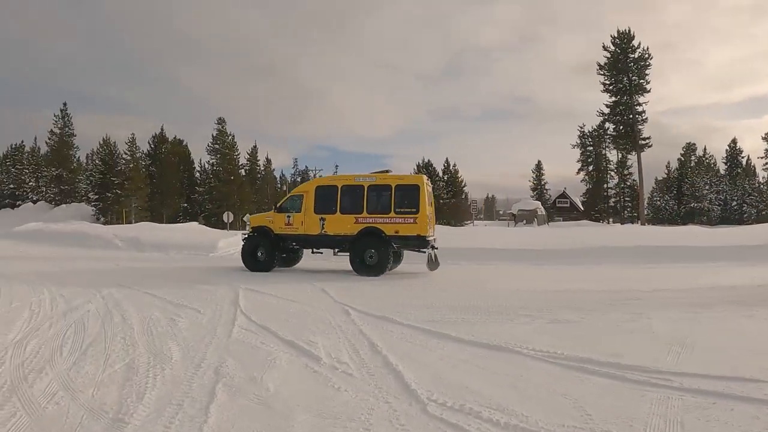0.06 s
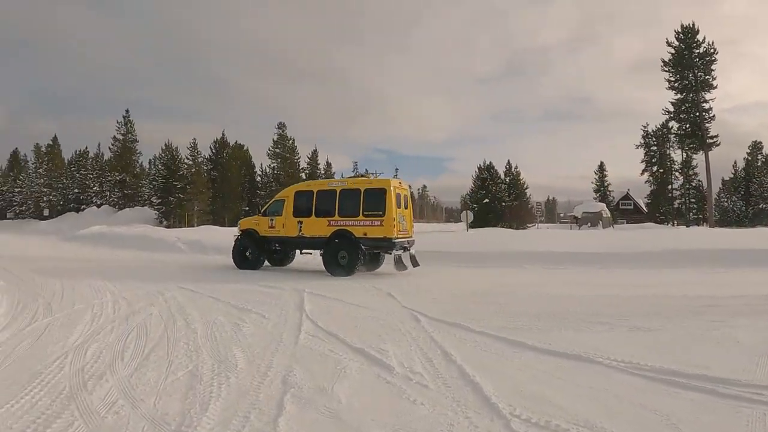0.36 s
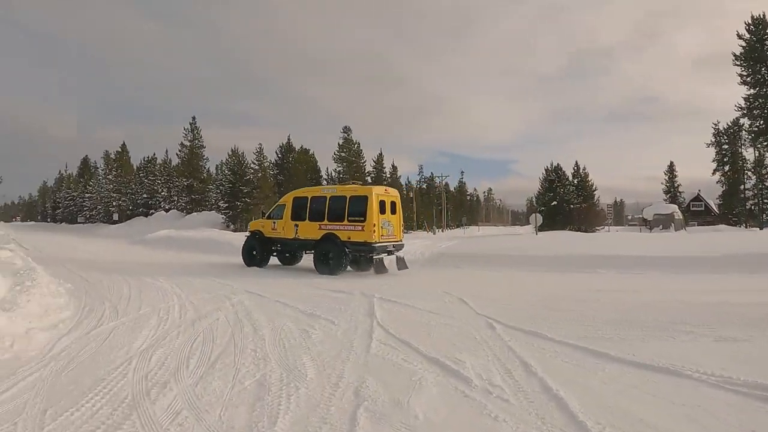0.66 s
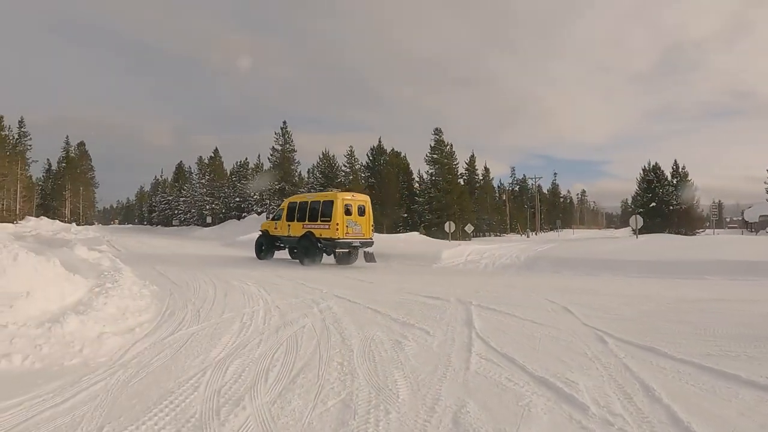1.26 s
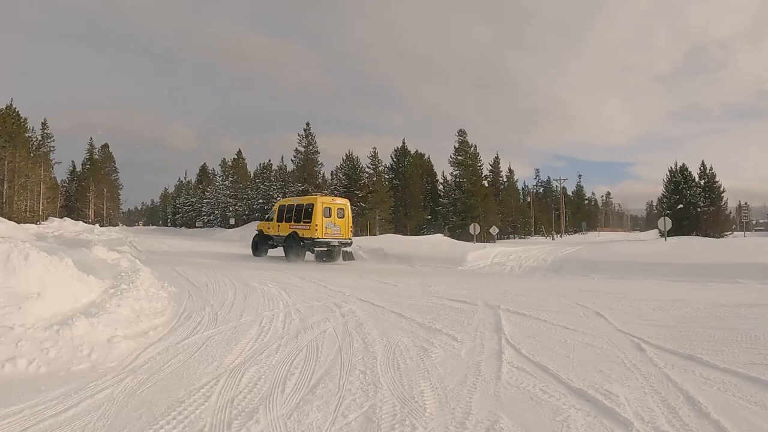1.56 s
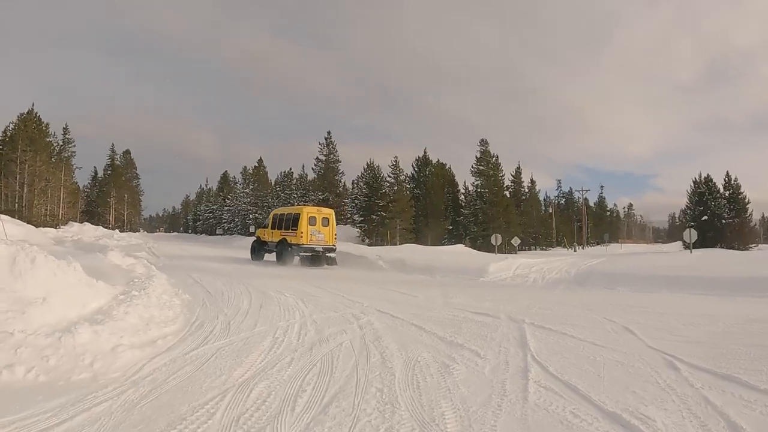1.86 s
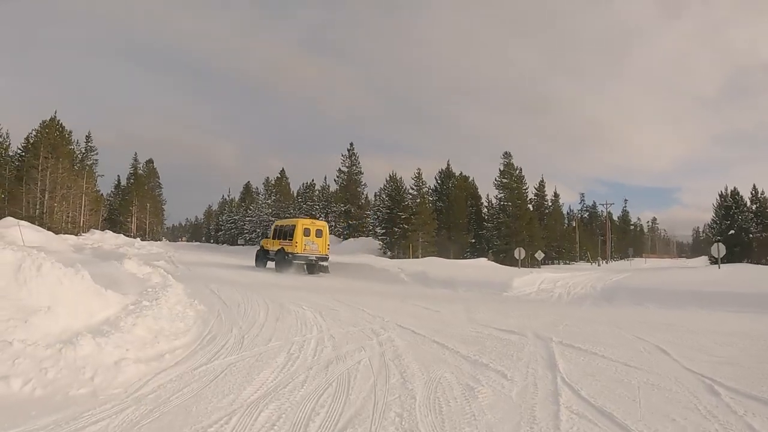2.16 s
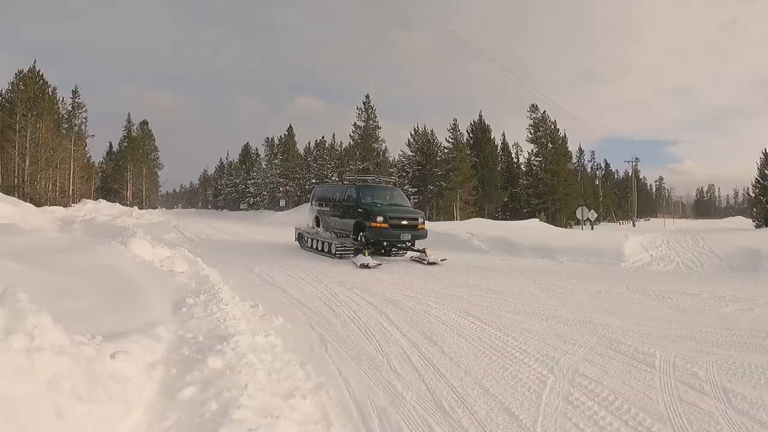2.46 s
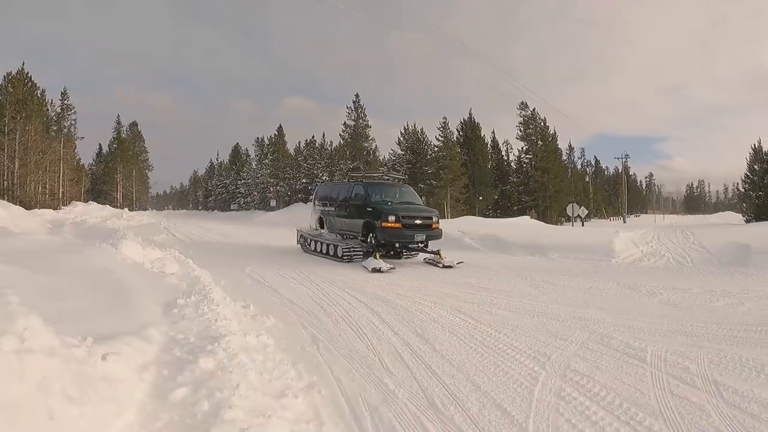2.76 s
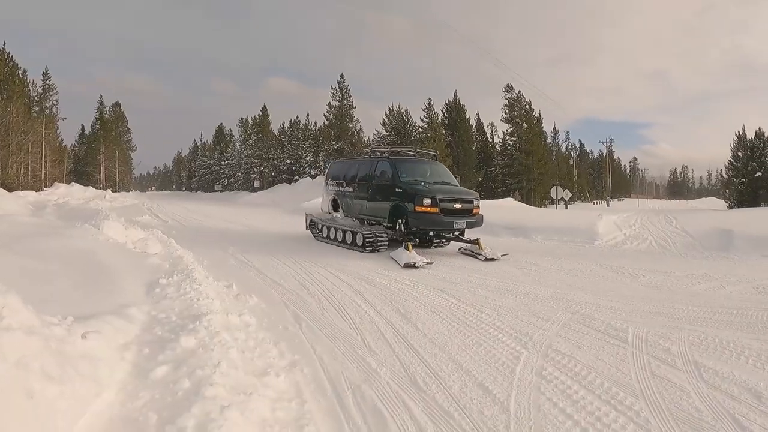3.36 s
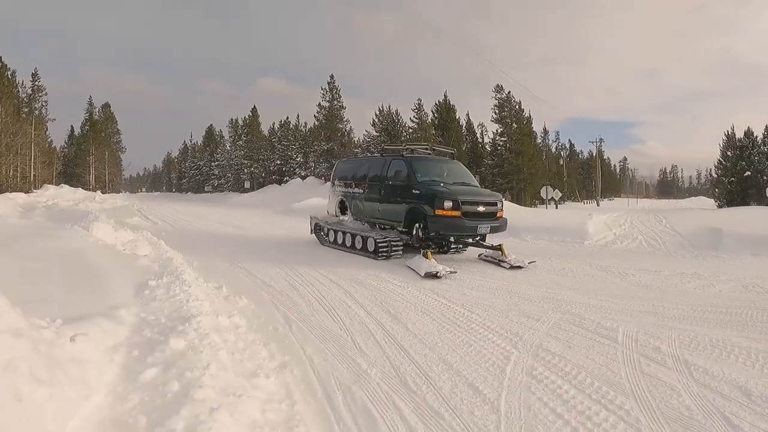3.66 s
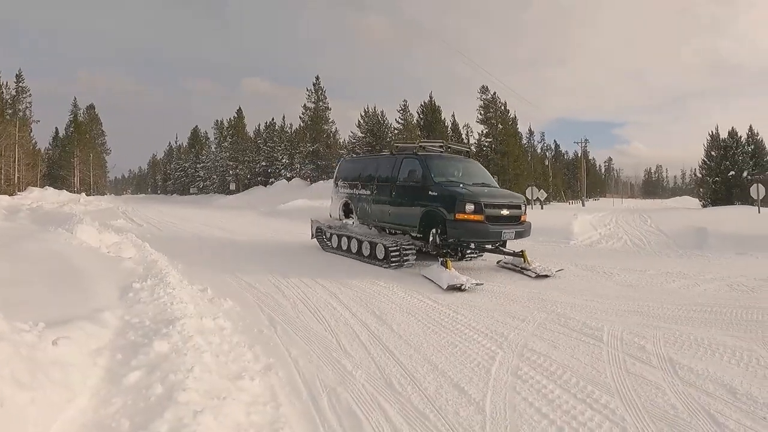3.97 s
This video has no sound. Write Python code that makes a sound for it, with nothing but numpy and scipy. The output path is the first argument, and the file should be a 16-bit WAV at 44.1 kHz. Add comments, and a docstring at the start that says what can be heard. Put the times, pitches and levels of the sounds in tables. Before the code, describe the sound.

Vans drive over snow outdoors: first one recedes with a low hum and soft tyre crunch, then another nears with clattering tracks and an exhaust drone. Close handling thumps and gusts of wind hit the microphone throughout.

```python
"""Big tyres crunch and an engine hums as a van rolls away down a snowy road.
The scene then switches to a van on tracks coming closer, its exhaust droning under the hiss
and rattle of cleats and skis on packed snow. Right at the hand-held stereo microphone,
wind buffets the ports and the case knocks, thumps and ticks in the grip."""
import sys
import numpy as np
from scipy import signal
from scipy.fft import rfft, irfft
from scipy.io import wavfile
from scipy.ndimage import uniform_filter1d

SR = 44100
rng = np.random.default_rng(int(sys.argv[2]) if len(sys.argv) > 2 else 0)


def persist_wave(psi):
    """Save psi, clipped to +-1, as 16-bit WAV."""
    counts = np.round(np.clip(psi, -1, 1) * 32767).astype(np.int16)
    wavfile.write(sys.argv[1], SR, np.atleast_2d(counts).T)


N = 176400
T = np.arange(N) / SR
FREQS = np.fft.rfftfreq(N, 1 / SR)
HIT_T = np.arange(SR // 6) / SR  # seconds since a contact


def amp(db):
    """Decibels to gain."""
    return 10 ** (np.asarray(db) / 20)


def unit(x):
    """Scales to rms 1."""
    return x / np.sqrt(np.mean(x ** 2) + 1e-20)


def over_time(table, column=1):
    """Reads a column of a table over time."""
    rows = np.array(table)
    return np.interp(T, rows[:, 0], rows[:, column])


def over_freq(table):
    """Reads a table over log frequency."""
    hz, values = np.transpose(table)
    return np.interp(np.log(FREQS + 1), np.log(hz + 1), values)


def add(mix, start, sound):
    """Mixes a sound in at a start time in seconds."""
    part = mix[..., round(start * SR):][..., :sound.shape[-1]]
    part += sound[..., :part.shape[-1]]


def drift(hz):
    """Random wander of rms 1, up to about the given rate."""
    return unit(irfft(rfft(rng.standard_normal(N)) / (1 + (FREQS / hz) ** 4), N))


def split(x, hz):
    """Low and high parts of a sound."""
    low = irfft(rfft(x) / (1 + (FREQS / hz) ** 8), N)
    return low, x - low


def soften(x, hz):
    """Steep low-pass: a soft contact has little treble."""
    return signal.sosfilt(signal.butter(4, hz, fs=SR, output="sos"), x)


def ring(modes, pitch):
    """Dying modes after one blow, peak 1."""
    x = sum((-1) ** k * amp(db - 60 * HIT_T / t60) * np.sin(2 * np.pi * hz * pitch * HIT_T)
            for k, (hz, db, t60) in enumerate(modes))
    return x / abs(x).max()


def at_microphone(pair, spectrum, coherence, balance, phase=((0, 0), (1, 0))):
    """Colours two unrelated signals and blends them into the left and right ports, rms 1."""
    common, separate = rfft(pair)
    alike = over_freq(coherence)
    lean = amp(over_freq(balance) / 2) * np.exp(.5j * over_freq(phase))
    left = common * lean
    right = (alike * common + np.sqrt(1 - alike ** 2) * separate) / lean
    return unit(irfft(np.array([left, right]) * amp(over_freq(spectrum)), N))


# Stereo image of the open road, for air and tyres alike
ROAD_COHERENCE = [(60, 1), (210, 1), (710, 0.86), (2450, 0.85), (8420, 0.73)]  # f/Hz, likeness of the ports/0-1
ROAD_BALANCE = [(60, 0.1), (160, -0.1), (430, 0.5), (1170, -1.0), (3130, -0.5), (8420, -0.5)]  # f/Hz, left over right/dB
# Open air all around: f/Hz, relative level/dB
AIR_SPECTRUM = [(200, 3.5), (800, -6.5), (1500, 3), (3000, -11.5), (4700, -11.5), (6200, -15),
                (7500, -25.5), (9000, -40), (12000, -42.5), (13000, -63.5)]

def air():
    """A steady faint hiss behind everything."""
    noise = rng.standard_normal((2, N))
    return amp(-58.5) * at_microphone(noise, AIR_SPECTRUM, ROAD_COHERENCE, ROAD_BALANCE)


# Wind right on the microphone
WIND_SPECTRUM = [(3, -15), (11, 7.5), (28, 2), (43, -3.5), (60, -12), (80, -16.5), (120, -22.5), (170, -28),
                 (260, -45), (600, -95), (2000, -150)]  # f/Hz, relative level/dB
GUSTS = [(0, -32), (.2, -26), (.37, -15.5), (.53, -31.5), (.76, -22), (.94, -16), (1.05, -21.5),
         (1.25, -28.5), (1.4, -21), (1.52, -16), (1.75, -24.5), (2.08, -15.5), (2.22, -24), (2.3, -18.5),
         (2.37, -24), (2.5, -17), (2.58, -31.5), (2.7, -23), (2.95, -31), (3.38, -36), (3.53, -24.5),
         (3.72, -30.5), (3.88, -27), (4, -27)]  # t/s, level/dB

def wind():
    """Lumpy low pressure swings, the same at both ports; weak gusts are duller."""
    swing = signal.hilbert(irfft(rfft(rng.standard_normal(N)) * amp(over_freq(WIND_SPECTRUM)), N))
    strength = np.sqrt(uniform_filter1d(abs(swing) ** 2, size=6000))
    low, high = split(unit(swing.real / strength), hz=85)
    level_db = over_time(GUSTS)
    dulling_db = 0.63 * np.minimum(level_db + 23, 0)  # sets in below -23 dB
    return amp(level_db) * (low + high * amp(dulling_db))


def thump(t, hz=140.3, t60=0.064, rise_s=0.0035):
    """The grip rocks briefly on its mount."""
    return 1.52 * (1 - np.exp(-t / rise_s)) * amp(-60 * t / t60) * np.sin(2 * np.pi * hz * t)


# The hand on the grip, right beside the microphone
GRIP_TICKS = [(0.058, -37, 2), (1.1835, -40.5, 5), (1.7857, -38, -1), (1.8606, -14, -1), (1.893, -32, 1),
              (1.9899, -32.5, 5), (2.1005, -29, -2), (2.403, -40, -1), (2.4927, -31.5, 0)]  # t/s, level/dB, left over right/dB
GRIP_MODES = [(1425, -6.5, 0.0041), (2516, -11.5, 0.027), (2910, -10, 0.02), (4940, -2.5, 0.014),
              (4240, -15, 0.004), (5100, -3, 0.0025), (6420, -1, 0.0043), (7950, -17.5, 0.0044),
              (9300, -19, 0.0043), (11950, -24, 0.0037)]  # f/Hz, relative level/dB, t60/s
HAND_BUMPS = [(.287, -12), (1.638, -18), (1.957, -21), (2.047, -19.5), (2.387, -27)]  # t/s, level/dB
FINGER_RUBS = [(0.012, 0.0088, -44.5, 1420, 1.94), (0.15, 0.11, -54.5, 2140, 1.72),
               (0.274, 0.01, -33.5, 2130, 1.34), (0.565, 0.0096, -44, 1590, 1.8),
               (0.704, 0.031, -57.5, 2640, 1.08), (0.844, .02, -45.5, 1210, 1.52),
               (1.456, 0.0031, -39, 1290, 1.8), (1.473, 0.0026, -36.5, 1230, 1.27),
               (1.63, 0.0048, -39.5, 1310, 1.26), (2.018, 0.0022, -40, 1470, 1.12),
               (2.045, 0.0065, -37, 1500, 1.08), (2.071, 0.0075, -46.5, 1450, 1.2),
               (3.764, 0.096, -40, 1240, 1.34)]  # peak t/s, half length/s, level/dB, centre f/Hz, band edge over centre

def handling():
    """Fingers tick, bump and rub on the grip; lighter ticks are duller."""
    out = np.zeros((2, N))
    for start, db, pan_db in GRIP_TICKS:
        chatter = 0.049 * rng.standard_normal((2, len(HIT_T))) * np.exp(-HIT_T / 0.002)
        contact = (HIT_T == 0) + chatter
        ringing = ring(GRIP_MODES, pitch=rng.uniform(0.92, 1.01))
        tick = signal.fftconvolve(contact, ringing[None], axes=1)
        gains = amp([[db + pan_db / 2], [db - pan_db / 2]])
        add(out, start, gains * soften(tick, hz=14700 + 214 * db))
    for start, db in HAND_BUMPS:
        add(out, start, amp(db) * thump(HIT_T * 0.905))  # a little lower and longer
    friction = rng.standard_normal((2, N)) * np.exp(0.27 * drift(hz=150))
    friction = friction + 0.61 * friction[::-1]  # each side reaches the other port too
    for peak, half, db, hz, spread in FINGER_RUBS:
        band = signal.butter(3, [hz / spread, hz * spread], "band", fs=SR, output="sos")
        out += amp(db) * np.exp(-((T - peak) / half) ** 2) * unit(signal.sosfilt(band, friction))
    return out


# Knocks on the case that holds the microphone:
# t/s, level/dB, thump/dB, shove/dB, pitch ratio, edge over knock/dB, cut-off f/Hz
CASE_KNOCKS = [(0.0148, -21.5, -24.5, -22, 1, -14.5, 4000), (0.2612, -26, -12.5, -43, 0.56, -44, 4000),
               (0.271, -9.5, -8.5, -23, 1.046, -16, 4000), (0.274, -26.5, -10.5, -33, 1.7, -12, 4000),
               (.5692, -20, -37, -18, 1.015, -24, 2500), (0.5722, -23.5, -23.5, -16.5, 1.13, -8, 3600),
               (0.8171, -28.5, -31, -36, 1, -16.5, 2200), (0.844, -21, -15, -17, 1.09, -24, 2180),
               (0.8668, -24, -40, -16.5, 0.59, -14, 1250), (1.4591, -16.5, -44, -32, 1.04, -15, 2200),
               (1.4643, -21, -16.5, -17.5, 0.88, -4, 3600), (2.0929, -34, -20, -19.5, 0.97, -23, 2000),
               (2.098, -33, -24, -29, 0.88, -24, 1800), (3.1022, -27.5, -25, -26, 0.91, -14, 1700),
               (3.1386, -25.5, -40, -40, 1.27, -18, 2200), (3.2027, -15.5, -19.5, -14.5, 1.11, -26, 1850),
               (3.2949, -21.5, -19, -14.5, 0.97, -11, 2000), (3.729, -21.5, -36, -34, 0.99, -27, 1800),
               (3.746, -29.5, -23, -29, 0.84, -8, 1800), (3.762, -19, -26, -16, 1.11, -18, 1800),
               (3.841, -28, -30, -37, 1.05, -18, 2400)]
CASE_MODES = [(504.6, -13.5, 0.048), (710, -18, 0.044), (1147, 3, 0.01), (1390, 0.5, 0.0089),
              (1568, -6.5, 0.022), (2640, -19.5, 0.028), (2980, -15.5, 0.027)]  # f/Hz, relative level/dB, t60/s
# Hollow notes, set by where the case is struck: t/s, f/Hz, level/dB
CASE_NOTES = [(.272, 505, -34), (.272, 1120, -29), (.571, 1163, -28), (.571, 730, -39), (.573, 1690, -38),
              (1.464, 533, -28), (1.465, 1320, -32)]

def knocks(shove_s=0.00034, edge_s=0.0028, rattle_t60=0.084, note_t60=0.065, note_rise_s=0.0015):
    """Knocks shove, ring and rattle the case, with a sharp edge and a thump; some leave hollow notes."""
    out, t = np.zeros((2, N)), HIT_T
    edge_band = signal.butter(5, [2500, 5540], "band", fs=SR, output="sos")
    shove = (t / shove_s - 1) * np.exp(-t / shove_s)  # the dull push of a contact
    for start, db, thump_db, shove_db, pitch, edge_db, cutoff_hz in CASE_KNOCKS:
        shake, grit = rng.standard_normal((2, 2, len(t)))
        blow = ring(CASE_MODES, pitch)
        rattle = unit(signal.fftconvolve(shake, blow[None], axes=1)[:, :len(t)])
        rattle *= amp(-60 * t / rattle_t60)
        edge = signal.sosfilt(edge_band, (grit + 0.41 * grit[::-1]) * np.exp(-t / edge_s))
        case = amp(db) * (blow + amp(-16) * (rattle + 0.3 * rattle[::-1])) + amp(shove_db) * shove
        add(out, start, soften(case, cutoff_hz) + amp(db + edge_db) * edge + amp(thump_db) * thump(t))
    for start, hz, db in CASE_NOTES:
        envelope = amp(db - 60 * t / note_t60) * (1 - np.exp(-t / note_rise_s))
        add(out, start, envelope * np.sin(2 * np.pi * hz * t))
    return out


def engine(run, orders, flutter_db, waver_rad):
    """A drone at the firing rate, with weaker side tones from uneven running."""
    firings = np.cumsum(over_time(run) * (1 + 0.0065 * drift(hz=20))) / SR
    drone = np.zeros(N)
    for order, db in orders:
        gain = amp(db + flutter_db * drift(hz=16))
        waver = (waver_rad + min(abs(order - 1), 1)) * drift(hz=15)  # side tones waver more
        drone += gain * np.sin(2 * np.pi * order * firings + waver)
    return amp(over_time(run, column=2)) * unit(drone)


# Engine of the wheeled van, heading away from the microphone
ENGINE_RUN = [(0, 54.85, -29), (.25, 56.05, -41.5), (.7, 56.04, -32.5), (1.2, 58.07, -27),
              (1.8, 59.66, -34.5), (2.15, 63.33, -33), (2.5, 64, -57)]  # t/s, firing f/Hz, level/dB
ENGINE_ORDERS = [(1, 3), (1.25, -17), (2, -21.5), (2.5, -16), (3, -24.5), (4, -28), (6, -27.5)]  # multiple of the firing rate, relative level/dB

def wheeled_engine():
    """A low hum that climbs as the van speeds up."""
    return engine(ENGINE_RUN, ENGINE_ORDERS, flutter_db=2.5, waver_rad=0.55)


# Big tyres on the snowy road, moving into the distance
TYRE_SPECTRUM = [(40, -0.5), (95, 3.5), (140, 5.5), (200, -6.5), (260, -10.5), (370, -11), (470, -15),
                 (600, -24), (830, -34), (1200, -18.5), (1750, -20.5), (2000, -23.5), (2900, -34.5),
                 (3700, -31), (4650, -27.5), (5200, -30.5), (6000, -35), (7000, -43), (7800, -45),
                 (9000, -63.5), (11000, -91.5), (13000, -105)]  # f/Hz, relative level/dB
TYRE_LEVEL = [(0, -40), (.3, -36.5), (.8, -38.5), (1.2, -41), (1.7, -41.5), (2.1, -47.5), (2.5, -44)]  # t/s, level/dB
TYRE_CRUNCH = [(0, -0.5), (.4, -4), (.78, -1.5), (.92, 1), (1.3, 1.5), (1.5, 5.5), (1.7, 2), (2.05, 10.5),
               (2.5, 6.5)]  # t/s, relative treble level/dB

def tyres():
    """Soft tyres crunch over the snow above a low road rumble."""
    rolling = at_microphone(rng.standard_normal((2, N)), TYRE_SPECTRUM, ROAD_COHERENCE, ROAD_BALANCE)
    rumble, crunch = split(rolling, hz=860)
    rumble *= amp(2.6 * drift(hz=14.3))
    crunch *= amp(over_time(TYRE_CRUNCH) + 1.1 * drift(hz=35))
    return amp(over_time(TYRE_LEVEL)) * (rumble + crunch)


# Squeaks from the approaching running gear: peak t/s, f/Hz, level/dB
GEAR_SQUEAKS = [(2.831, 2710, -37.5), (2.91, 6370, -44), (3.39, 5560, -40), (3.967, 5906, -37),
                (3.986, 5550, -33)]

def squeaks(half_s=0.0063):
    """Metal parts of the tracks chirp roughly now and then."""
    roughness = 0.97 * drift(hz=350)
    return sum(amp(db) * np.exp(-((T - peak) / half_s) ** 2) * np.sin(2 * np.pi * hz * T + roughness)
               for peak, hz, db in GEAR_SQUEAKS)


# Exhaust of the tracked van, heading for the microphone
EXHAUST_RUN = [(2.53, 146.1, -46), (2.74, 156.8, -35), (2.83, 148.4, -37.5), (2.89, 148, -55),
               (2.96, 149.4, -41.5), (3.12, 148.6, -38), (3.3, 148.8, -37), (3.42, 145.4, -40.5),
               (3.52, 141.7, -41.5), (3.63, 144.1, -37), (3.72, 135.2, -42.5), (3.8, 139.8, -32.5),
               (3.9, 141, -35.5), (4, 138, -36.5)]  # t/s, firing f/Hz, level/dB
EXHAUST_ORDERS = [(.75, -8), (1, -1.5), (1.25, -11), (1.42, -19.5), (2, -34), (3.001, -31)]  # multiple of the firing rate, relative level/dB

def tracked_exhaust():
    """Firing pulses merge into a higher, smoother drone that sags a little in pitch."""
    return engine(EXHAUST_RUN, EXHAUST_ORDERS, flutter_db=1, waver_rad=0.12)


# Tracks and skis on packed snow, closing in
TRACK_SPECTRUM = [(100, -3.5), (200, 6), (320, -3.5), (500, -1.5), (650, -13.5), (820, -21), (1080, 0),
                  (1400, -1.5), (1600, -2), (1710, 3), (1970, -11), (2170, -5), (2380, -11.5), (2730, -1.5),
                  (3030, -8.5), (3300, -4), (3600, -8.5), (4150, -3), (4400, -5.5), (4670, -1.5),
                  (5200, -7.5), (5550, -5), (5750, -9.5), (5950, -5.5), (6600, -11.5), (7050, -18.5),
                  (7500, -20.5), (8000, -21), (8900, -32), (10500, -48), (11800, -44.5), (13000, -60)]  # f/Hz, relative level/dB
TRACK_APPROACH = [(2.53, -38.5), (2.8, -37.5), (3.0, -38), (3.1, -36.5), (3.25, -37.5), (3.42, -38.5),
                  (3.51, -33.5), (3.68, -35), (3.85, -34.5), (4, -34.5)]  # t/s, level/dB
TRACK_CLATTER = [(2.53, -1), (2.85, 0), (3.2, -0.5), (3.42, 1), (3.53, -3.5), (3.66, -3), (3.75, 1),
                 (3.85, -1), (4, -2)]  # t/s, relative clatter level/dB
GEAR_MODES = [(1706, 39, -15.5), (2156, 110, -20.5), (2720, 51, -26), (4510, 150, -12.5), (4706, 68, -16),
              (4880, 40, -27), (7500, 90, -26), (8000, 75, -35.5)]  # f/Hz, width/Hz, relative level/dB
# Their stereo image at the microphone
TRACK_COHERENCE = [(60, 0.66), (160, 1), (430, 0.78), (1170, 0.69), (3130, 0.92), (8420, 1)]  # f/Hz, likeness of the ports/0-1
TRACK_BALANCE = [(150, 5.5), (330, -1.5), (560, 7.5), (820, -15), (1100, 2.5), (1470, -5.5), (1950, 6),
                 (2630, 7.5), (3500, -2.5), (4700, -2.5), (6300, -2), (8400, 5.5)]  # f/Hz, left over right/dB
TRACK_PHASE = [(0, 0.42), (950, -0.00035), (1290, -0.27), (1890, -0.06), (2150, -0.94), (2670, -1.54),
               (3010, -0.45), (3450, -1.6), (4050, -0.4), (5080, 0.37), (5340, -0.1), (6980, 0.66),
               (7840, -0.056), (8610, -1.1)]  # f/Hz, left lead/rad

def tracks(cleats_per_s=52, grains_per_s=500):
    """Cleats bite the snow in quick succession, crushing grains and ringing the gear; the skis hiss."""
    cleats = np.cumsum(cleats_per_s * (1 + 0.1196 * drift(hz=4.7))) / SR
    beat = 1 + 0.092 * np.cos(2 * np.pi * cleats)
    grains = rng.standard_normal((2, N)) * (rng.random(N) < grains_per_s / SR)
    crushing = beat * (rng.standard_normal((2, N)) + 0.4 * unit(grains))
    image = TRACK_COHERENCE, TRACK_BALANCE, TRACK_PHASE
    snow = at_microphone(crushing, TRACK_SPECTRUM, *image)
    shaking = at_microphone(beat * rng.standard_normal((2, N)), TRACK_SPECTRUM, *image)
    gear = sum(amp(db) * unit(signal.lfilter(*signal.iirpeak(hz, hz / width, SR), shaking))
               for hz, width, db in GEAR_MODES)
    clatter, hiss = split(0.82 * snow + gear, hz=2130)
    clatter *= amp(over_time(TRACK_CLATTER) + 1.2 * drift(hz=40))
    hiss *= amp(1.27 * drift(hz=25))
    return amp(over_time(TRACK_APPROACH)) * (clatter + hiss)


def scene(switch_s=2.531, fade_s=0.0033, right_db=0.42):
    """One van leaves, then the other approaches, with wind and handling at the microphone."""
    switch = np.clip((T - switch_s) / fade_s, 0, 1)
    leaving = tyres() + wheeled_engine()
    coming = tracks() + squeaks() + tracked_exhaust()
    mix = (1 - switch) * leaving + switch * coming + air() + wind() + knocks() + handling()
    return mix * amp([[-right_db / 2], [right_db / 2]])


def record(dry, top_hz=13900):
    """The recorder's band limit."""
    lowpass = signal.firwin(511, top_hz, window=("kaiser", 9), fs=SR)
    return signal.oaconvolve(dry, lowpass[None], "same")


dry = scene()
out = record(dry)
persist_wave(out)
```